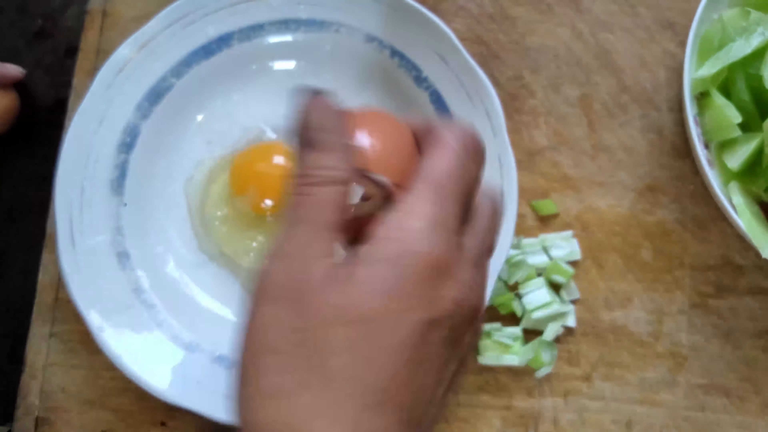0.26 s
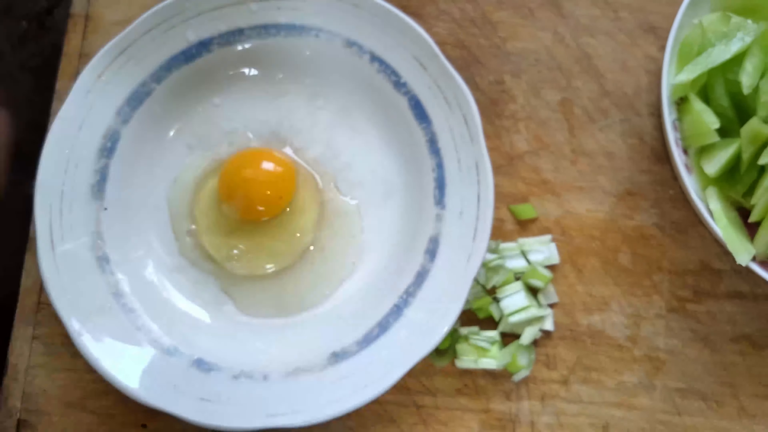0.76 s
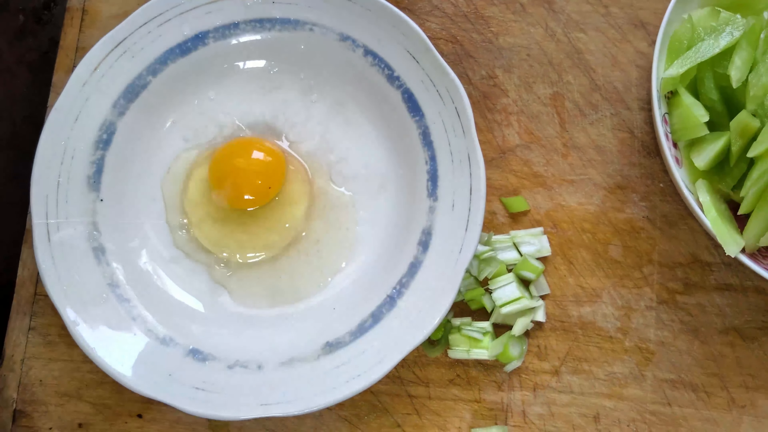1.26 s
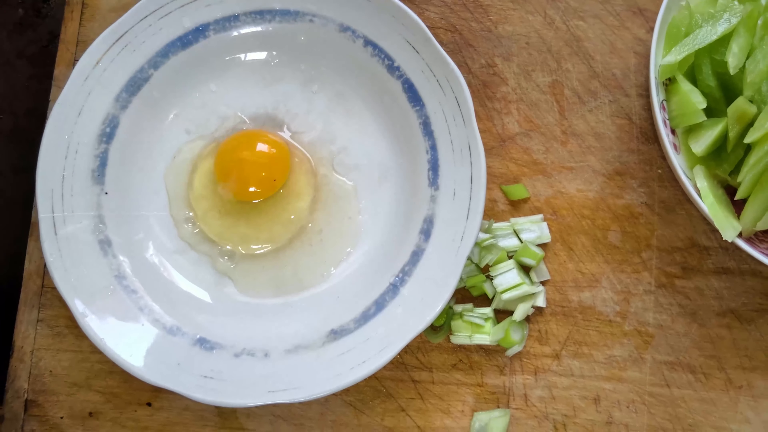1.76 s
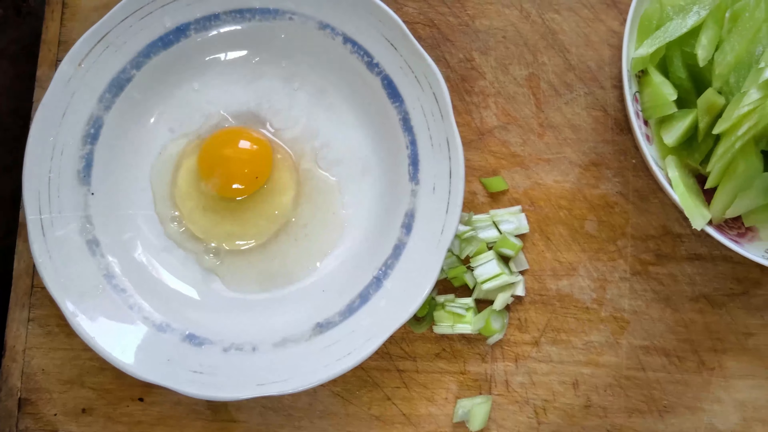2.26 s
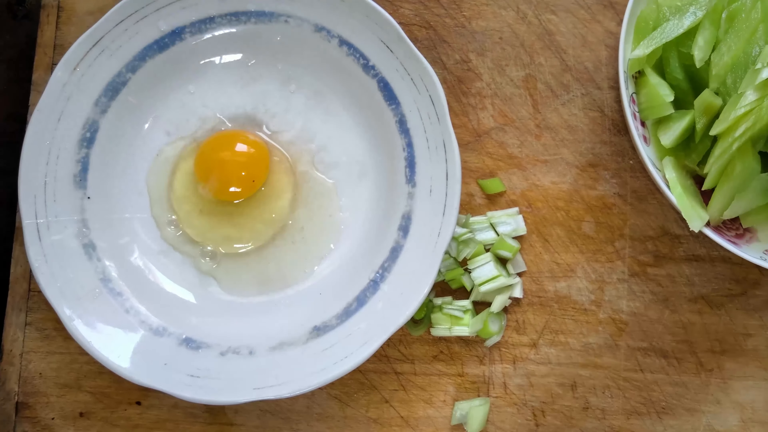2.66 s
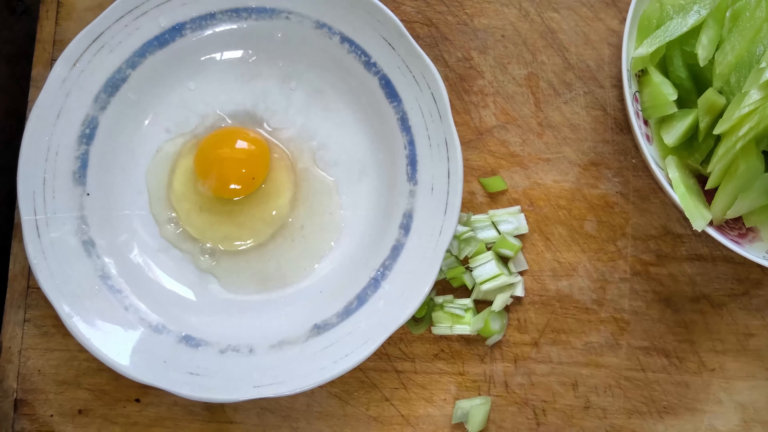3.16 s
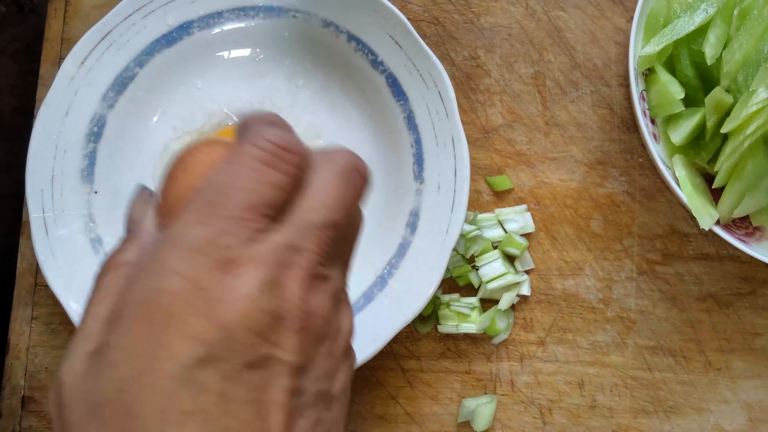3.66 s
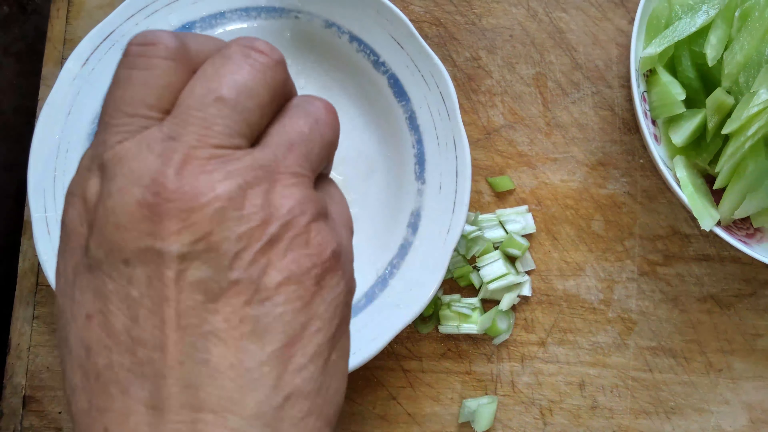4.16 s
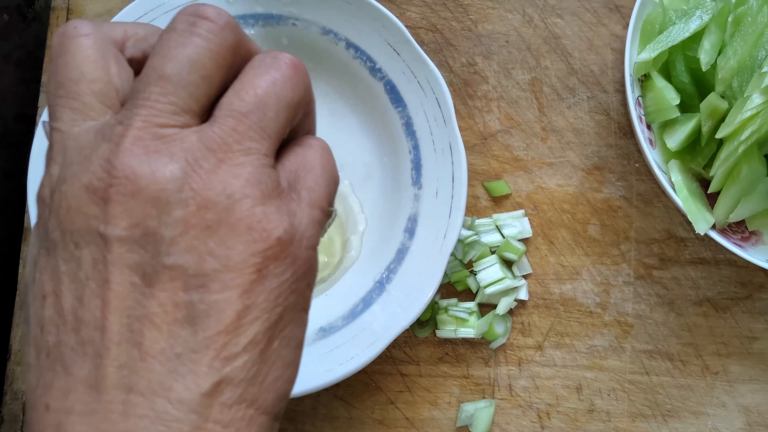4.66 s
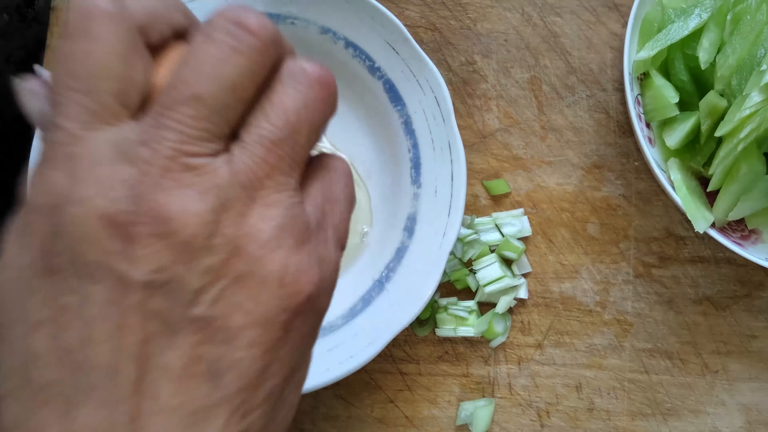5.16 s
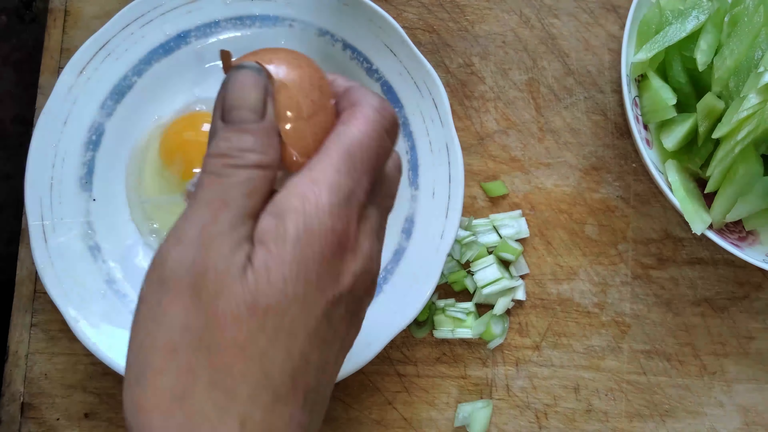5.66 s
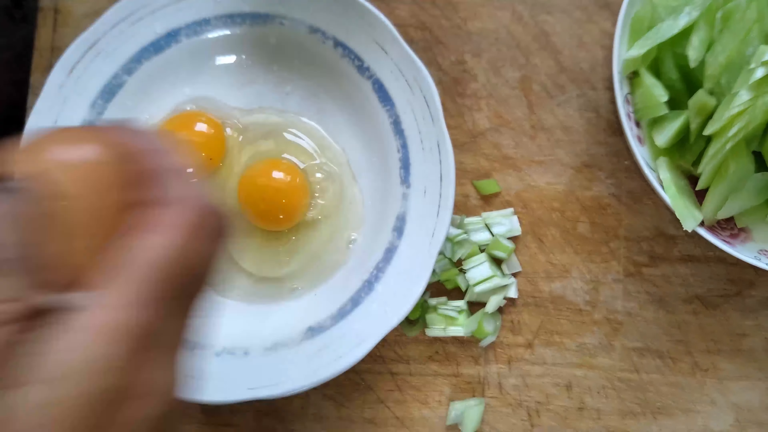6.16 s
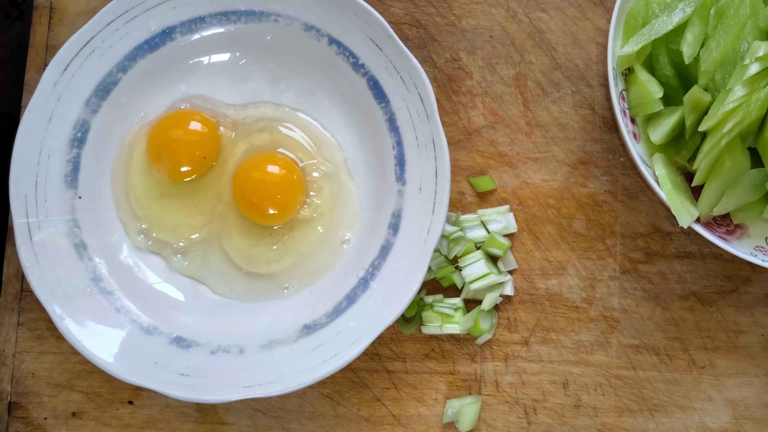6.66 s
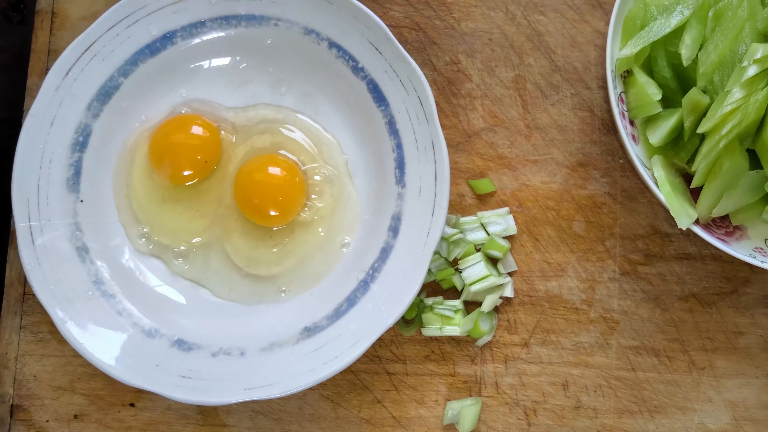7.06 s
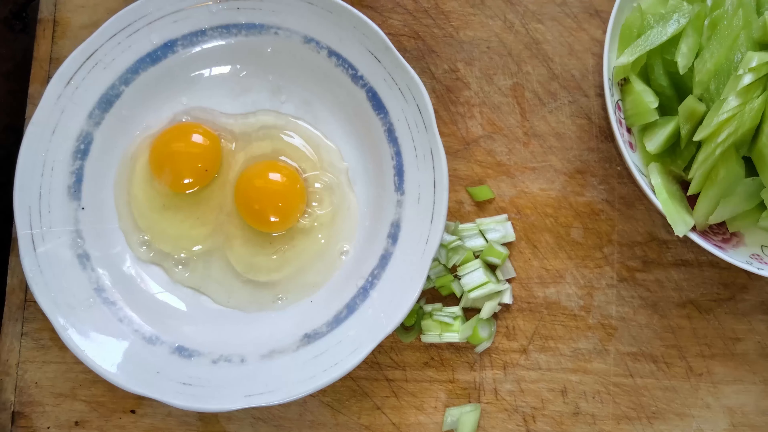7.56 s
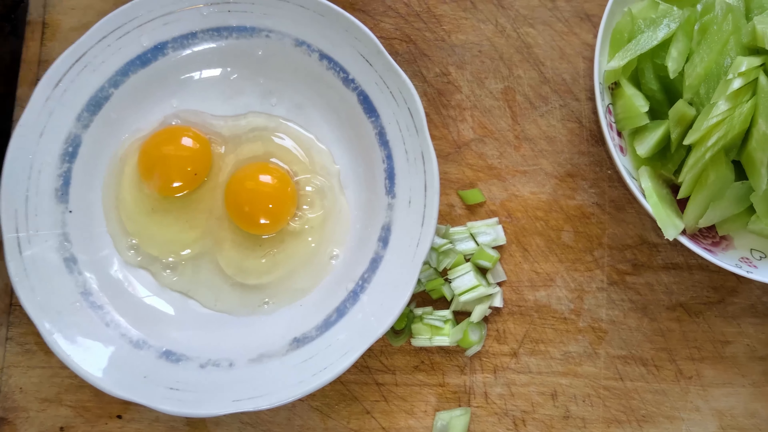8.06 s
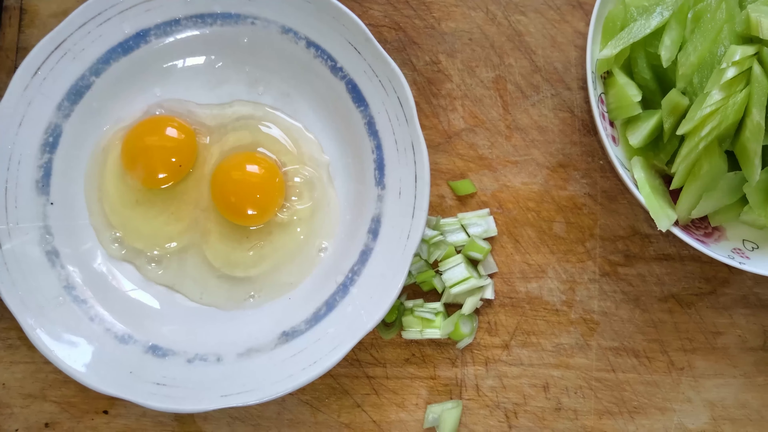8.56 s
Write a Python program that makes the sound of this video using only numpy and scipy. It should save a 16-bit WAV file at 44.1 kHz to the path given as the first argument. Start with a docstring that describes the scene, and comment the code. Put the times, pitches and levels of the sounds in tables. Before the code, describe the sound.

Close stereo microphones in a small hard-walled kitchen. Faint shell snaps and hollow half-shell clacks come first, with slight finger rubbing. After a pause two loud knocks boom in the worktop as an egg is struck, then a dense flurry of shell cracks and ticks. Later a thin plastic bag rustles brightly, with sharp snaps, and a brief wet squelch near the end. Low steady room hum throughout.

```python
"""Cracking eggs in a kitchen

Eggs are cracked in a small hard-walled kitchen, close to two microphones. Shells snap, clack and tick:
short noise bursts that ring resonances. A thin plastic bag rustles: random pops of coloured noise.
Two knocks boom in the worktop: fading sine waves and a dull burst of noise. Fingers rub and squelch,
a thin hiss comes and goes and things rumble as they are moved: bands of noise that swell and fade.
Under it all lies the low hum of the room: steady noise with faint drifting patches."""
import sys
import numpy as np
from scipy import signal
from scipy.fft import rfft, irfft, next_fast_len
from scipy.io import wavfile
from scipy.ndimage import uniform_filter1d

SR = 44100
rng = np.random.default_rng(int(sys.argv[2]) if len(sys.argv) > 2 else 0)


def digitize_waveform(pressure):
    """Quantize a signal to 16-bit integers and store it at the path in sys.argv[1].

    Rows of a 2-D input are taken as channels; values are limited to [-1, 1].
    """
    field = np.atleast_2d(pressure).T
    bounded = np.clip(field, -1, 1)
    quanta = np.round(bounded * 32767).astype(np.int16)
    wavfile.write(sys.argv[1], SR, quanta)


N = 388962  # length in samples

# snaps of shell and plastic, echoing in the room; the two rings are set relative to the bright peak: # start_s,
# bright_peak_db, shell_pitch_hz, shell_ring_db, hollow_ring_db
SNAPS = [(0.036, -25.5, 4070, -5, -10.5), (0.087, -25, 5400, -9, -34), (0.118, -20, 5350, -8.5, -42),
         (0.243, -27.5, 3830, -7.5, -22), (0.31, -20, 5650, -1.5, -21), (0.322, -21.5, 4570, -2, -43),
         (0.425, -25, 4400, 0, -8), (0.867, -20, 5200, -7, -16.5), (0.8955, -14.5, 4600, -16, -16.5),
         (1.5228, -15, 4400, -2.5, -29), (2.0715, -34.5, 4270, -6.5, -21), (2.497, 1.5, 4630, -4, -7),
         (3.03, -1, 4800, -17.5, -18), (3.042, -12.5, 5000, -16, -15.5), (3.718, -29, 6750, -23, -23),
         (4.0011, -19.5, 5700, -6, -32), (4.056, -16, 3860, -7, -11.5), (4.0701, -12.5, 4300, -5, -12.5),
         (4.1324, -11.5, 4330, 1, -6.5), (4.18, -19.5, 3450, 1.5, -7), (4.2438, -10.5, 4340, -0.5, -20),
         (4.249, -13.5, 4740, -11.5, -35), (4.276, -15, 4180, -17, -11), (4.2904, -4.5, 4380, -5.5, -20),
         (4.387, -11, 5330, -4, -40), (4.448, -5.5, 4770, -3.5, -34), (4.472, -22, 4740, -2.5, -36),
         (4.508, -17.5, 4300, -5.5, -26), (4.629, -21, 5500, -16, -34), (4.6398, -17.5, 4080, -12, -34),
         (4.6824, -18, 4350, -9, -14.5), (4.783, -27.5, 5440, -10.5, -26), (5.668, -25.5, 4260, -6.5, -34),
         (5.6847, -17, 5680, -26, -34), (5.7926, -19, 5900, 3, -11), (6.187, -25, 5800, -9.5, -14),
         (6.7647, -12.5, 4850, 4, -20), (7.2459, -7, 3700, -2, -11), (8.1257, -16.5, 4050, -16, -28),
         (8.139, -25.5, 3400, 3.5, -42), (8.176, -13, 4100, -11, -20.5), (8.1941, -15, 4060, -4, -17),
         (8.2655, -8.5, 4180, -14, -34)]
SNAP_T60_S, SNAP_HOLLOW_HZ, SNAP_HOLLOW_WIDTH_HZ = 0.018, 1760, 770
SNAP_ROOM_DB, SNAP_RINGS_ROOM_DB = -2.5, -3.5  # sent to the room: bright part, both rings


def snaps():
    """Shell and plastic break in a short bright burst that rings shell and hollow, then the room."""
    near, to_room = np.zeros((2, N)), np.zeros(N)
    for start, db, shell_hz, shell_db, hollow_db in SNAPS:
        bright, shell, hollow = crack(SNAP_T60_S, shell_hz, SNAP_HOLLOW_HZ, SNAP_HOLLOW_WIDTH_HZ,
                                      db, db + shell_db, db + hollow_db)
        rings = shell + hollow
        add(near, start, bright + rings)
        add(to_room, start, bright[0] * gain_of(SNAP_ROOM_DB) + rings[0] * gain_of(SNAP_RINGS_ROOM_DB))
    return near + kitchen(to_room)


# hollow clacks of half shells; the bright edge is set relative to the hollow peak:
# start_s, hollow_peak_db, hollow_pitch_hz, bright_edge_db, burst_t60_s (time to fall by 60 dB)
CLACKS = [(0.7145, -31.5, 1430, -21, 0.087), (0.728, -38, 1730, -17, 0.069), (0.792, -41, 1560, 1, 0.038),
          (0.8682, -32, 1880, -20, 0.075), (0.9586, -23.5, 1640, -2, 0.24), (0.9661, -26, 1690, 6.5, 0.049),
          (1.001, -21, 1640, 1, 0.13), (1.046, -35, 1690, -6, .04), (1.105, -51, 1740, -14, 0.058),
          (1.1868, -32, 1620, -2.5, 0.13), (1.259, -32, 1640, -5.5, 0.19), (1.2915, -31, 1746, -4, 0.26),
          (4.64, -32, 1510, -20, 0.047), (4.658, -35, 1490, -20, 0.047), (4.6817, -32, 1510, -20, 0.05),
          (4.7096, -30.5, 1360, -20, 0.056), (4.7116, -21, 1880, -8.5, 0.088),
          (4.8826, -39.5, 1900, -5, 0.097), (5.0315, -22.5, 1766, 5, 0.0092),
          (7.252, -15.5, 1820, -2.5, 0.16)]
CLACK_HOLLOW_WIDTH_HZ, CLACK_SHELL_HZ = 330, 4300
CLACK_SHELL_DB, CLACK_ROOM_DB = -6, -12  # shell ring relative to the bright edge; level sent to the room


def clacks():
    """Half shells knock: a ring of the hollow with a bright edge and an echo in the room."""
    near, to_room = np.zeros((2, N)), np.zeros(N)
    for start, db, hollow_hz, edge_db, t60 in CLACKS:
        bright_db = db + edge_db
        clack = sum(crack(t60, CLACK_SHELL_HZ, hollow_hz, CLACK_HOLLOW_WIDTH_HZ,
                          bright_db, bright_db + CLACK_SHELL_DB, db))
        add(near, start, clack)
        add(to_room, start, clack[0] * gain_of(CLACK_ROOM_DB))
    return near + kitchen(to_room)


# very short ticks close to the microphones; the shell ring is set relative to the bright peak:
# start_s, bright_peak_db, shell_pitch_hz, shell_ring_db
TICKS = [(3.243, -7, 6140, -23), (4.105, -25, 4440, 6), (4.124, -17, 4370, 7.5), (4.21, -18, 4480, 5),
         (4.284, -3.5, 3450, -5), (4.399, -11, 6740, -8), (4.662, -13, 5550, -15), (5.09, -21, 4240, 1),
         (5.631, -21, 3900, -20), (5.768, -29, 4660, -3.5), (7.207, -10, 5100, 5.5)]
TICK_T60_S = 0.009


def ticks():
    """Very short dry cracks close to the microphones, with no hollow ring and no room sound."""
    near = np.zeros((2, N))
    for start, db, shell_hz, shell_db in TICKS:
        tick = sum(crack(TICK_T60_S, shell_hz, SNAP_HOLLOW_HZ, SNAP_HOLLOW_WIDTH_HZ,
                         db, db + shell_db, -np.inf))
        add(near, start, tick)
    return near


BRIGHT_HZ, BRIGHT_WIDTH_HZ, SHELL_WIDTH_HZ = 9500, 3000, 1410


def crack(t60, shell_hz, hollow_hz, hollow_width_hz, bright_db, shell_db, hollow_db):
    """A burst of noise rings a wide bright band, a shell band and a hollow band."""
    t = np.arange(4096) / SR
    burst = rng.standard_normal((2, len(t))) * gain_of(-60 * t / t60)
    burst *= 1 - np.exp(-t / 0.0011)  # soft start
    bands = ((BRIGHT_HZ, BRIGHT_WIDTH_HZ), (shell_hz, SHELL_WIDTH_HZ), (hollow_hz, hollow_width_hz))
    parts = [ring(burst, *band) for band in bands]
    return [gain_of(db) * part / abs(part).max()
            for db, part in zip((bright_db, shell_db, hollow_db), parts)]


# rustles of the bag; the body is set relative to the crinkle:
# start_s, swell_s, hold_s, crinkle_db, body_db
RUSTLES = [(-0.2, 0.32, 0.1, -46, -12), (0.295, 0.017, 0.014, -35, -15.5), (0.355, 0.061, 0.32, -46, -12),
           (0.846, 0.011, .04, -48, -17), (0.923, 0.058, 0.0069, -38, -4.5),
           (1.464, 0.01, 0.046, -37, -16.5), (1.509, 0.0064, 0.074, -21, -10.5),
           (2.061, 0.022, 0.12, -75, -1), (2.459, 0.05, 0.044, -28, -17), (2.919, 0.11, 0.56, -49.5, -14),
           (3.545, 0.033, 0.29, -54.5, -12), (4.011, 0.073, 0.016, -28.5, -13),
           (4.183, 0.086, 0.015, -29, -11.5), (4.406, 0.036, 0.023, -29.5, -16.5),
           (4.61, 0.049, 0.049, -46, -1.5), (5.022, 0.051, 0.017, -53, 10.5),
           (5.396, 0.015, 0.17, -64.5, -3.5), (5.609, 0.019, .03, -37, -14),
           (5.779, 0.012, 0.013, -30.5, -5), (5.846, 0.11, .55, -51, -13.5),
           (5.977, 0.045, 0.075, -46, -7.5), (6.507, 0.012, 0.057, -32.5, -13),
           (6.522, 0.14, 0.13, -23, -20), (6.701, 0.076, 0.16, -18.5, -11.5),
           (6.936, 0.049, 0.071, -23, -12.5), (7.027, 0.08, 0.15, -29, -13),
           (7.161, 0.091, 0.095, -17.5, -8), (7.265, 0.032, 0.078, -14.5, -23),
           (7.886, 0.022, .18, -53.5, -14.5), (8.119, 0.013, 0.083, -35, -3), (8.25, 0.021, 0.027, -34, 7),
           (8.616, 0.089, .08, -60.5, -3), (8.768, 0.013, 0.034, -36, -25)]
# tone of the bright film: pitch_hz, relative_level_db (per Hz)
CRINKLE_TONE = [(1800, -63.5), (3500, -32), (5000, -15.5), (6800, -16), (8300, -11), (9200, -0.5),
                (10100, -2.5), (11200, -12.5), (13000, -16), (15600, -20)]
# tone of the duller body: pitch_hz, relative_level_db (per Hz)
BODY_TONE = [(250, -19.5), (430, -12.5), (700, -6.5), (1500, -2.5), (2600, 4), (4300, 1.5), (5000, -5.5),
             (8000, -2.5), (12000, -48.5)]
CRINKLE_FADE_DB_PER_S, BODY_FADE_DB_PER_S = 114, 96  # the body lingers longer
POPS_FADE_DB_PER_S = 299.5  # separate pops stop when the hand stops; a smooth tail is left
PATCHES_DB = 2.5  # depth of random drifting patches of colour in the rustle
BAG_LEAN_DB = -1  # the bag lies to the right: left minus right, film only


def bag():
    """Countless popping creases excite the bright film and its duller body, unlike in each channel."""
    film_rows = [row[:4] for row in RUSTLES]
    body_rows = [(*row[:3], row[3] + row[4]) for row in RUSTLES]
    film = spells(film_rows, CRINKLE_FADE_DB_PER_S)
    body = spells(body_rows, BODY_FADE_DB_PER_S)
    moving = spells(film_rows, POPS_FADE_DB_PER_S) / (film + 1e-9)  # near 1 as the hand moves, then falls

    creases = grains(600, 3.2, 0.004)
    average = creases.mean()
    roughness = moving * (creases - average) + average + 1.5
    pops = roughness * rng.standard_normal((2, N))

    spectrum = signal.stft(pops, nperseg=256)[2]
    patches = uniform_filter1d(rng.standard_normal(spectrum.shape[1:]), size=3, axis=0)
    patches = evened(uniform_filter1d(patches, size=16, axis=1))
    pops = signal.istft(spectrum * gain_of(PATCHES_DB * patches), nperseg=256)[1][:, :N]
    lean = gain_of(BAG_LEAN_DB * np.array([[0.5], [-0.5]]))
    return lean * film * colour(pops, CRINKLE_TONE) + body * colour(pops, BODY_TONE)


# knocks on the worktop: start_s, swell_s, dull_clack_db, then one level_db for each low mode
# (a mode is one way the worktop rings; levels are relative, before swell and filter)
KNOCKS = [(2.497, 0.02, -3, -37.5, -18, -15, -28, -22, -22, -25.5, -21.5, -13.5),
          (3.029, 0.025, -7.5, -28, -26.5, -24, -12, -16, -33, -29, -31, -21)]
# low modes of the worktop, the close pairs beat: pitch_hz, t60_s
WORKTOP = [(72, 0.12), (115, 0.3), (161, 0.3), (187, 0.47), (197, 0.37), (245, .2), (299, 0.4), (310, .36),
           (355, .12)]
BOOM_ROOM_DB = -10


def knocks():
    """A blow swells the low modes of the worktop and throws a dull clack into the room."""
    low, upper = np.zeros(N), np.zeros(N)
    t = np.arange(SR // 2) / SR
    dull = signal.butter(2, [250, 3200], "band", fs=SR)
    for start, swell, clack_db, *modes_db in KNOCKS:
        boom = 0
        for k, (db, (hz, t60)) in enumerate(zip(modes_db, WORKTOP)):
            wave = (np.exp(2j * np.pi * hz * t) * wavering(t)).imag
            # neighbours start in opposite directions, so a close pair first cancels, then swells
            boom = boom + (-1) ** k * gain_of(db - 60 * t / t60) * wave
        add(low, start, boom * (1 - np.exp(-t / swell)))
        clack = signal.lfilter(*dull, rng.standard_normal(len(t)))
        clack *= gain_of(clack_db - 60 * t / 0.038) * (1 - np.exp(-t / 0.0019))
        add(upper, start, clack)
    add(upper, KNOCKS[0][0], gain_of(-19) * panel(t))  # only the hard first knock rings these
    return low + gain_of(-1.5) * upper + kitchen(upper + gain_of(BOOM_ROOM_DB) * low)


# upper modes of the worktop: pitch_hz, relative_level_db, t60_s
PANEL = [(820, -6, 0.08), (1470, -1, 0.16), (1560, -1, 0.13), (2050, 1, .15), (2300, -1, 0.12),
         (2836, 1, 0.14)]


def panel(t):
    """Upper modes ring as fading sine waves, each with its own random rattle in strength."""
    total = 0
    for hz, db, t60 in PANEL:
        rattle = evened(1 + ring(rng.standard_normal(len(t)), 45, 70) * 14)
        total = total + gain_of(db - 60 * t / t60) * np.sin(2 * np.pi * hz * t) * rattle
    return total


WAVER_PER_S, WAVER_HZ = 3.2, 18  # growth of the waver; its fastest speed, roughly


def wavering(t):
    """A random waver of strength and phase grows after the blow."""
    slow = signal.butter(2, WAVER_HZ, fs=SR)
    # the first half only lets the filter settle
    a, b = signal.lfilter(*slow, rng.standard_normal((2, 2 * len(t))))[:, len(t):]
    share = np.clip(WAVER_PER_S * t, 0, 1)
    return np.sqrt(1 - share ** 2 / 2) + share / 2 * (evened(a) + 1j * evened(b))


# rubbing and wet squelch of fingers on shell and film:
# start_s, swell_s, hold_s, level_db, pitch_hz, width_hz
RUBS = [(0.192, 0.018, 0.17, -57, 1910, 250), (0.437, 0.078, 0.21, -53, 4650, 500),
        (0.498, .06, 0.1, -59, 3000, 250), (0.692, 0.022, 0.67, -53.5, 1690, 720),
        (8.118, 0.02, 0.1, -38.5, 3960, 900), (8.16, 0.018, 0.27, -50, 438, 60),
        (8.262, .012, 0.088, -30.5, 3480, 1700), (8.72, .015, 0.054, -61.5, 3670, 147)]
RUB_FADE_DB_PER_S = 202.5


def rubs():
    """Friction noise that catches and slips, in one resonance for each rub."""
    slips = evened(grains(250, 3, 0.012) + 1)
    total = 0
    for *spell, hz, width in RUBS:
        noise = evened(ring(rng.standard_normal((2, N)), hz, width))
        total = total + spells([spell], RUB_FADE_DB_PER_S) * noise
    return slips * total


# dull rumbles of handling, one list for each, points joined by straight lines:
# time_s, level_db, deep_share (0 to 1)
THUMPS = [
    [(6.75, -56, 0.03), (6.928, -45.5, 0.02), (7.05, -64, 0.1)],
    [(8.1, -56, 0.6), (8.296, -41, 0.42), (8.47, -58, 0.56)],
    [(8.55, -61, 1), (8.68, -55, 0), (8.8, -63, 0.6)],
]


def thump():
    """Lumpy low noise while things are moved, blended from a deep and a dull band."""
    deep = evened(ring(rng.standard_normal(N), 65, 36))
    dull = evened(ring(rng.standard_normal(N), 220, 220))
    total = 0
    for level_db, share in map(curves, THUMPS):
        share = np.clip(share, 0, 1)
        total = total + gain_of(level_db) * (share * deep + (1 - share) * dull)
    return total


# spells of hiss: start_s, swell_s, hold_s, level_db (of the main band)
HISS = [(-0.1, 0.12, 0.3, -46), (2.45, 0.32, 0.44, -47.5), (2.9, 0.16, 0.44, -42.5),
        (5.58, 0.081, 0.47, -49), (5.7, 0.65, 0.076, -47), (6.3, 0.61, 0.11, -29), (8.766, .01, .1, -37.5)]
HISS_FADE_DB_PER_S = 179.5
HIGH_HISS_DB = -16  # the upper band relative to the main one


def hiss():
    """A thin high hiss: noise in two narrow bands, unlike in the two channels."""
    noise = rng.standard_normal((2, N))
    main, high = (evened(signal.sosfilt(signal.butter(3, band, "band", fs=SR, output="sos"), noise))
                  for band in ([11300, 13040], [14300, 15700]))  # Hz
    return spells(HISS, HISS_FADE_DB_PER_S) * (main + gain_of(HIGH_HISS_DB) * high)


# tone of the room noise: pitch_hz, relative_level_db (per Hz)
HUM_TONE = [(26, -37), (45, -16), (206, -10.5), (313, 0), (524, -13.5), (602, -9.5), (855, -16.5),
            (984, -14), (1460, -18.5), (4710, -29), (5420, -57), (6850, -34), (12000, -33.5), (15600, -72),
            (22000, -120)]
HUM_DB = -56


def hum():
    """Steady room noise, strongest in the lows and low mids, with faint drifting patches."""
    noise = signal.stft(rng.standard_normal((2, N + 2048)), nperseg=1024, noverlap=768)[2]
    patches = uniform_filter1d(rng.standard_normal(noise.shape[1:]), 10, 0)
    patches = evened(uniform_filter1d(patches, 14, 1))
    wash = signal.istft(pair(noise) * gain_of(2.2 * patches), nperseg=1024, noverlap=768)[1][:, :N]
    return gain_of(HUM_DB) * colour(wash, HUM_TONE)


# how long the room rings: pitch_hz, t60_s
KITCHEN = [(150, 0.47), (800, 0.47), (2300, 0.45), (6000, 0.42), (12000, 0.14)]


def kitchen(x):
    """Dense reflections from hard walls, each band dying at its own speed."""
    hz, t, noise = signal.stft(rng.standard_normal((2, SR)), SR, nperseg=256)
    fade_db = -60 * t / read(KITCHEN, hz)[:, None]
    tail = signal.istft(pair(noise) * gain_of(fade_db), SR, nperseg=256)[1]
    # the reflections set in within the first millisecond
    tail *= np.clip(np.arange(tail.shape[1]) / SR / 0.00051 - 0.5, 0, 1)
    return signal.fftconvolve(x[None], tail / np.linalg.norm(tail[0]), axes=1)[:, :N]


# how alike left and right are: pitch_hz, likeness (1 same, 0 unrelated, below 0 opposed)
LIKENESS = [(60, 0.5), (240, 0.84), (950, 0.4), (3770, -0.16), (15000, -0.31)]


def pair(z):
    """Spaced microphones: the bass is more alike in both channels than the treble."""
    same = read(LIKENESS, np.fft.rfftfreq(2 * z.shape[1] - 2, 1 / SR))
    same = np.clip(same, -1, 1)[:, None]
    return np.array([z[0], same * z[0] + np.sqrt(1 - same ** 2) * z[1]])


SWELL_DB = 20  # each swell climbs this far


def spells(rows, fade_db_per_s):
    """Loudness over time: swell, hold and steady fade; overlapping spells add in power."""
    t, power = np.arange(0, N / SR + 0.01, 0.001), 0
    for start, swell, hold, db in rows:
        top = start + swell + 1e-3
        rising_db = np.interp(t, [start, top], [-SWELL_DB, 0], -np.inf)
        fading_db = fade_db_per_s * np.maximum(t - top - hold, 0)
        power = power + gain_of(db + rising_db - fading_db) ** 2
    return np.interp(np.arange(N) / SR, t, np.sqrt(power))


def grains(per_s, spread_db, t60):
    """Loudness of small soft-edged bursts popping at random, some larger."""
    size = gain_of(spread_db * np.minimum(rng.exponential(1, N), 3))
    size *= rng.random(N) < per_s / SR
    power = signal.lfilter([1], [1, -gain_of(-120 / t60 / SR)], size ** 2)  # each burst dies away
    return np.sqrt(abs(uniform_filter1d(power, size=40)))


def ring(x, hz, width):
    """A resonance of gain 1 at its peak, applied twice for steep skirts."""
    b, a = signal.iirpeak(hz, hz / width, SR)
    return signal.lfilter(b, a, signal.lfilter(b, a, x))


def colour(x, points):
    """Shapes the spectrum of both channels, then sets their joint average level (rms) to 1."""
    size = next_fast_len(N)
    gain = gain_of(read(points, np.fft.rfftfreq(size, 1 / SR)))
    return evened(irfft(rfft(x, size) * gain, size)[..., :N])


def gain_of(db):
    """Turns decibels into a factor."""
    return 10 ** (np.asarray(db) / 20)


def evened(x):
    """Sets the average level (rms) to 1."""
    return x / np.sqrt(np.mean(x ** 2) + 1e-20)


def read(points, hz):
    """Reads a table by pitch, joined by straight lines on a logarithmic pitch scale."""
    f, value = np.transpose(points)
    return np.interp(np.log(hz + 1), np.log(f + 1), value)


def curves(rows):
    """Columns of a table joined by straight lines, one value a sample; -120 outside."""
    s, *columns = np.transpose(rows)
    return [np.interp(np.arange(N) / SR, s, c, -120, -120) for c in columns]


def add(mix, s, sound):
    """Adds a sound to the mix from s seconds on, cut at the end."""
    part = mix[..., round(s * SR):][..., :sound.shape[-1]]
    part += sound[..., :part.shape[-1]]


def scene():
    """All sources together."""
    shells = snaps() + clacks() + ticks()
    return shells + bag() + knocks() + rubs() + thump() + hiss() + hum()


# the right microphone is more sensitive at most pitches: pitch_hz, left_minus_right_db
LEAN = [(60, -5), (250, -1.5), (550, -3.5), (1650, -4.5), (4970, 0.5), (9500, -7), (13000, -0.5)]
LAG = 8  # samples by which the left microphone hears later
EDGE_HZ = 15750  # upper limit of the sound


def record(dry):
    """Unequal microphones, a hard ceiling, then the band limit."""
    size = next_fast_len(N)
    lean_db = read(LEAN, np.fft.rfftfreq(size, 1 / SR)) * np.array([[0.5], [-0.5]])
    heard = irfft(rfft(dry, size) * gain_of(lean_db), size)[:, :N]
    heard = np.clip(heard, -1, 1)
    heard[0] = np.r_[np.zeros(LAG), heard[0, :-LAG]]
    low_pass = signal.firwin(511, EDGE_HZ, window=("kaiser", 9), fs=SR)
    return signal.oaconvolve(heard, low_pass[None], "same")


dry = scene()
out = record(dry)
digitize_waveform(out)
```